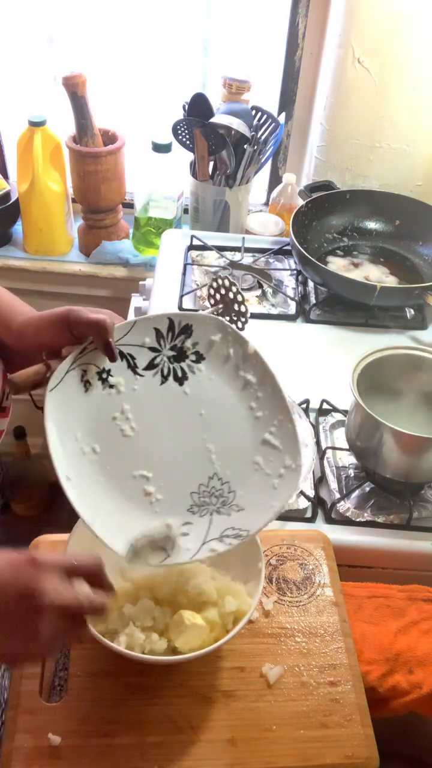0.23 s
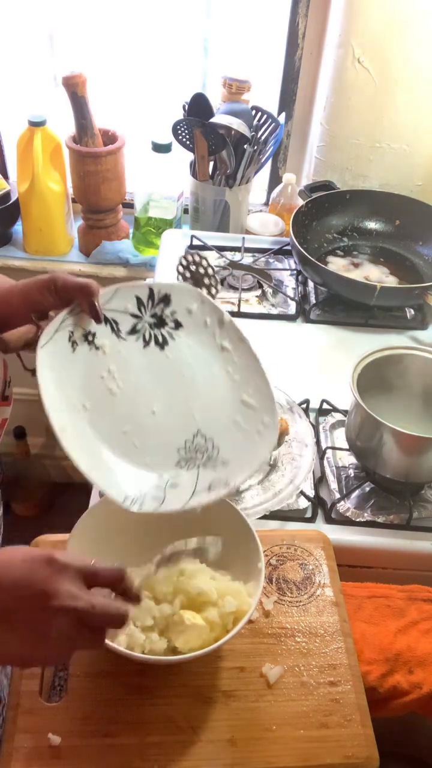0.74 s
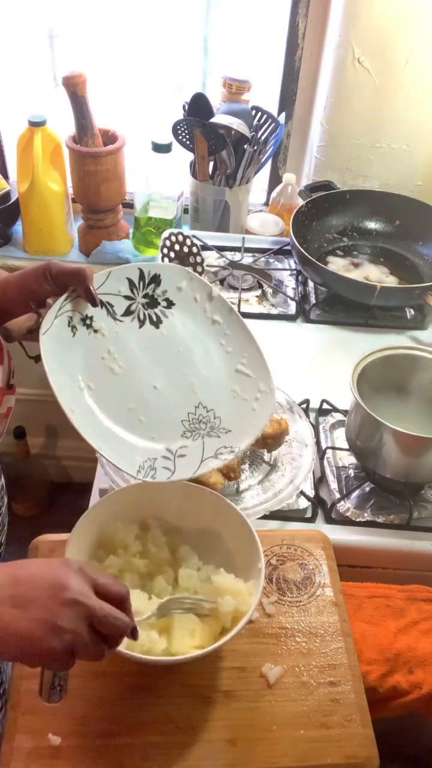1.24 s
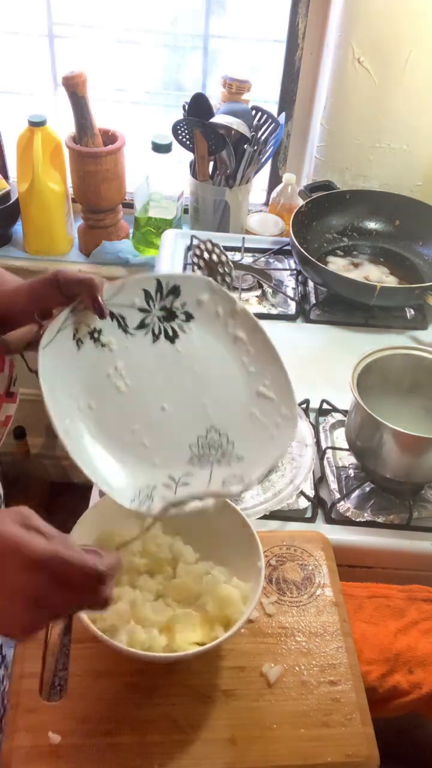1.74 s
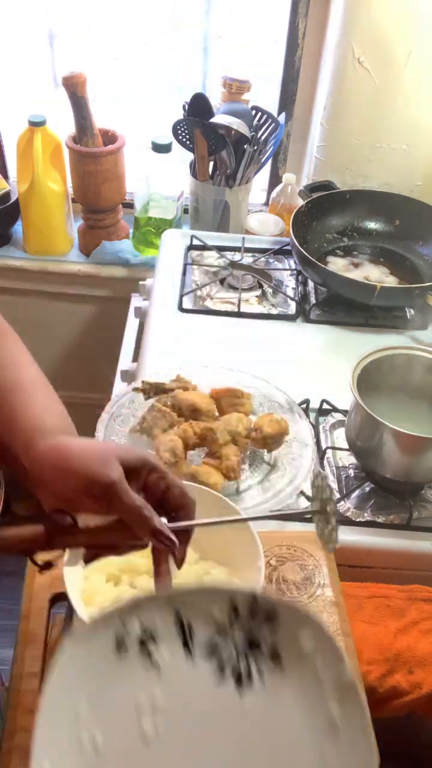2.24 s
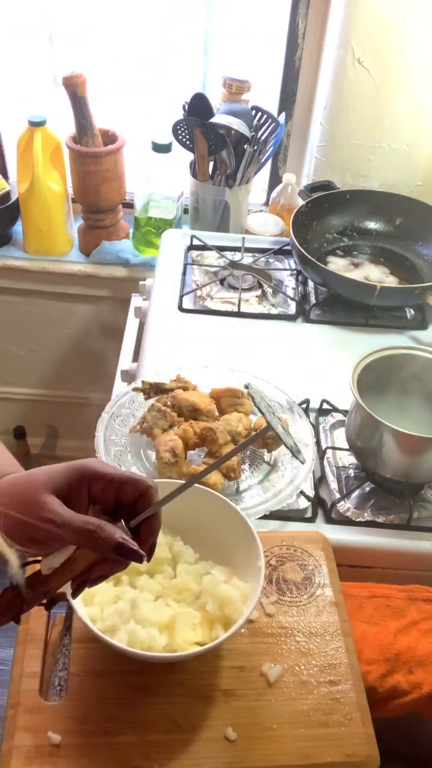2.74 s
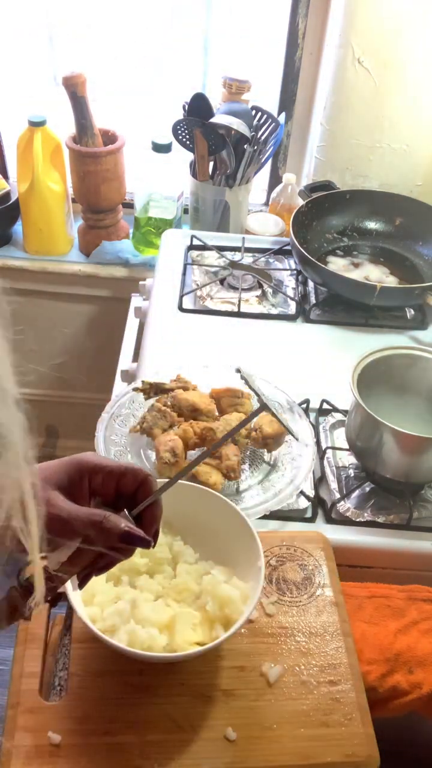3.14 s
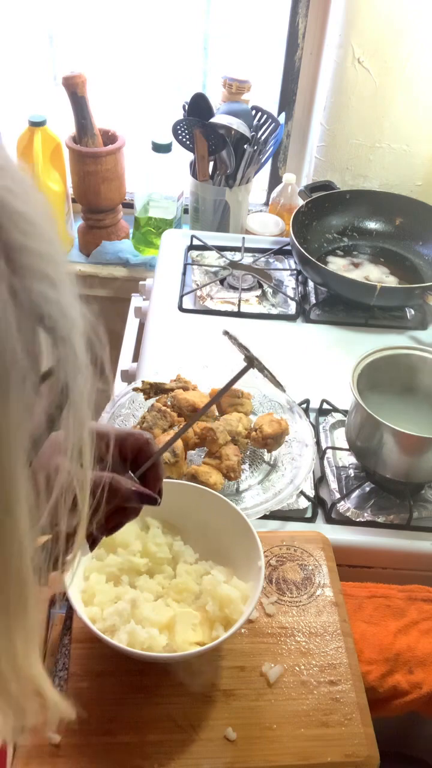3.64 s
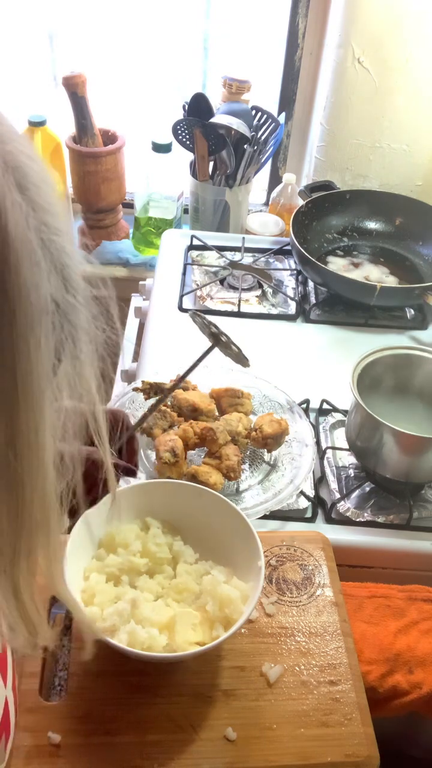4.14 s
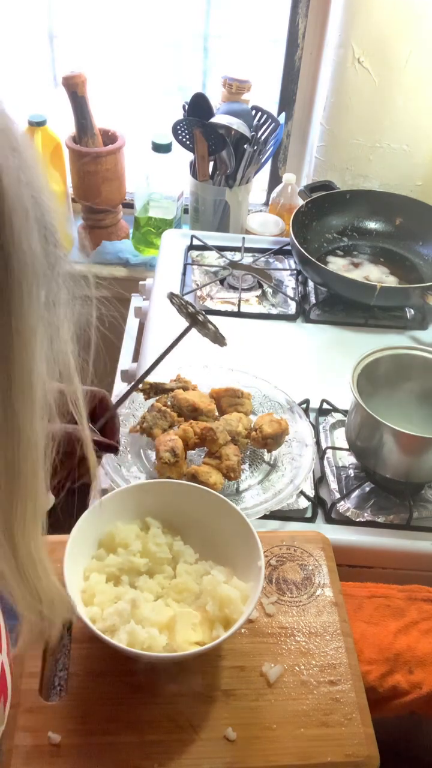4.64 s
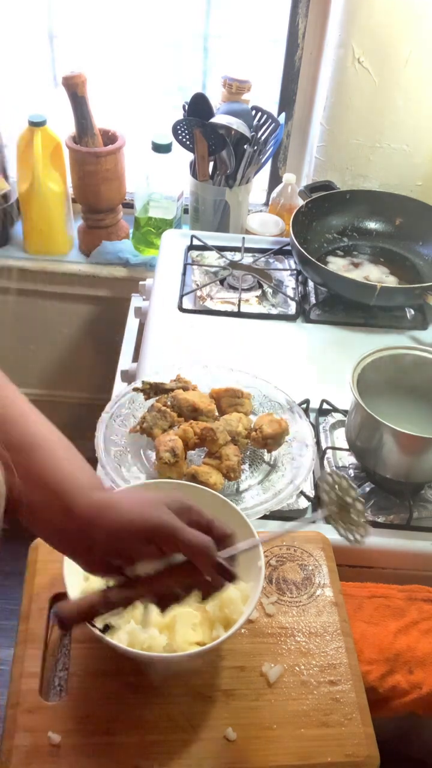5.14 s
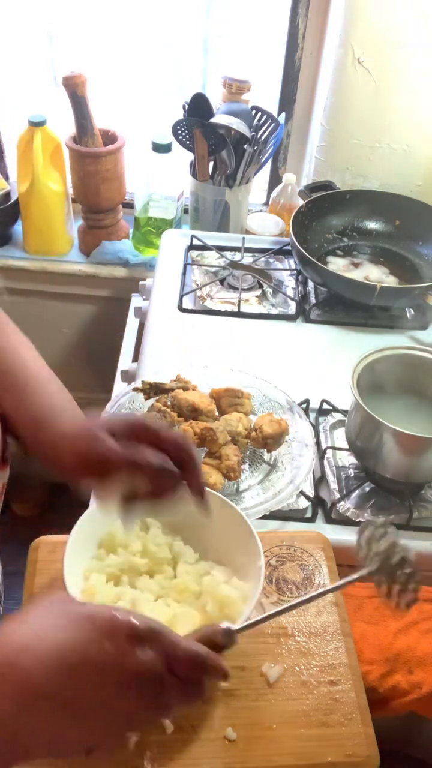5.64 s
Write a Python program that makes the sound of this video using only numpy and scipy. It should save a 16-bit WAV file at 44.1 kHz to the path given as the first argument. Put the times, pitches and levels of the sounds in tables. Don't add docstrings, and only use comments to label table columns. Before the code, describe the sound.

Light utensil taps and one hard plate knock, a quiet gap, then a burst of crashing dishes in a booming sink and running water.

```python
import sys
import numpy as np
from scipy import signal
from scipy.fft import rfft, irfft, next_fast_len
from scipy.io import wavfile
from scipy.ndimage import uniform_filter1d

SR = 44100
rng = np.random.default_rng(int(sys.argv[2]) if len(sys.argv) > 2 else 0)


def volts_from_decibels(level):
    exponent = np.asarray(level, float) / 20
    return 10 ** exponent


def store_pcm(level_fs):
    pcm = np.round(np.clip(level_fs, -1, 1) * 32767).astype(np.int16)
    wavfile.write(sys.argv[1], SR, np.atleast_2d(pcm).T)


N = 259743
FFT_SIZE = next_fast_len(N)
SPLIT_HZ = 4700

# f/Hz, level/dB, t60/s
PLATE = [(330, -10, .06), (581, -15, .08), (781, -5, .07), (1690, -12, .12), (2760, -2, .03),
         (2880, 0, .045), (2980, -3, .07), (3591, -13, .05), (3941, -12, .07), (4350, -8, .1)]
PLATE_RIM = [(5730, 1.5, 0.059), (5780, -10, 0.13), (7100, -0.5, 0.021), (9630, 1.5, 0.032),
             (9700, -21.5, 0.056), (10760, -24.5, 0.17)]
# f/Hz, density/dB per Hz
CRACK_BODY = [(210, -54), (400, -13), (746, 0), (824, -3), (1470, -7), (1660, -9), (4000, -7.5),
              (5000, -27), (6500, -61.5), (11000, -120)]
CRACK_BRIGHT = [(2880, -23.5), (4900, -0.5), (5330, -6), (6210, 3), (6760, -8), (8000, 0), (8620, -4),
                (9800, -7), (11500, -15.5), (12300, -36), (14600, -24), (16000, -42.5)]


def rms_one(x):
    return x / np.sqrt(np.mean(x ** 2) + 1e-20)


def on_grid(points, column=1):
    hz = np.maximum(np.fft.rfftfreq(FFT_SIZE, 1 / SR), 1)
    points = np.array(points)
    return np.interp(np.log(hz), np.log(points[:, 0]), points[:, column])


def shaped(x, response):
    return irfft(rfft(x, FFT_SIZE) * response, FFT_SIZE)[:N]


def coloured(x, colour):
    return shaped(x, rms_one(volts_from_decibels(on_grid(colour))))


def step(at_s, rise_s):
    return np.clip((np.arange(N) / SR - at_s) / rise_s, 0, 1)


def drift(rate, size=N):
    r = np.exp(-80 * np.pi * rate / SR)
    white = rng.standard_normal(size // 40 + 2002)
    slow = signal.lfilter([1], [1, -2 * r, r * r], white)[2000:]
    return np.interp(np.arange(size) / 40, np.arange(len(slow)), rms_one(slow))


def grains(colour, per_s, spread_db, flicker_db):
    sizes = volts_from_decibels(spread_db * np.minimum(rng.exponential(1, N), 4)) * rng.choice([-1, 1], N)
    happens = rng.random(N) < per_s / SR
    return rms_one(coloured(sizes * happens * volts_from_decibels(flicker_db * drift(15)), colour))


def strokes(rows, attack_s, column=3):
    t = np.arange(0, N + 32, 32)[:, None] / SR
    rows = np.array(rows)
    start, length, fade = rows[:, 0], rows[:, 1], np.maximum(rows[:, 2], .005)
    swell = np.clip((t - start) / attack_s, 0, 1) ** 2
    shape = swell * volts_from_decibels(-20 * np.maximum(t - start - length, 0) / fade)
    power = np.sum((shape * volts_from_decibels(rows[:, column])) ** 2, axis=1)
    return np.interp(np.arange(N) / SR, t[:, 0], np.sqrt(power))


def ring(push, hz, t60):
    r, w = volts_from_decibels(-60 / (t60 * SR)), 2 * np.pi * hz / SR
    return signal.lfilter([.5, 0, -.5], [1, -2 * r * np.cos(w), r * r], push + 1e-18)


def ring_cluster(push, hz, t60):
    spread = .008 * (1 + hz / SPLIT_HZ) * (np.linspace(-1, 1, 4) + rng.normal(0, .3, 4))
    cluster = sum((-.85) ** k * ring(push, hz * (1 + d), t60) for k, d in enumerate(spread))
    return cluster * volts_from_decibels(4 * drift(70, size=len(push)) - 2)


def struck(contacts, modes, longest_s, ring_db, crack_db, rise_s):
    chatter, push = np.zeros((2, N)), np.zeros((2, N))
    white = rng.standard_normal(N)
    t = np.arange(SR // 5) / SR
    swell = 1 - np.exp(-t / np.array([[max(rise_s, 1e-4)], [2e-4]]))
    for s, body_db, bright_db, touch_s in contacts:
        i, touch_s = round(s * SR), np.clip(touch_s, .001, .04)
        levels = volts_from_decibels([[body_db], [bright_db]])
        burst = swell * np.exp(-t / touch_s) * white[i:i + len(t)] * levels
        chatter[:, i:i + len(t)] += burst
        push[:, i:i + len(t)] += burst / np.sqrt(touch_s * SR / 2)
    out = np.zeros(N)
    first, last = min(contacts)[0], max(contacts)[0]
    span = slice(round(first * SR), round(last * SR) + SR // 2)
    for bright in (0, 1):
        group = [m for m in modes if (m[0] > SPLIT_HZ) == bright]
        total = np.sqrt(sum(volts_from_decibels(m[1]) ** 2 for m in group))
        for hz, db, t60 in group:
            rung = ring_cluster(push[bright, span], hz, min(t60, longest_s))
            out[span] += volts_from_decibels(db + ring_db) / total * rung
    crack = coloured(chatter[0], CRACK_BODY) + coloured(chatter[1], CRACK_BRIGHT)
    return out + volts_from_decibels(crack_db) * crack


def rings(rows):
    rough = .7
    out, t = np.zeros(N), np.arange(SR // 5) / SR
    waver = volts_from_decibels(2.5 * drift(73))
    shake = drift(80, size=len(t) * len(rows)).reshape(len(rows), -1)
    for (s, hz, db, t60), shaken in zip(rows, shake):
        i = round(s * SR)
        wander = rough * np.clip(hz / 2500, .6, 2.5) * shaken
        swing = np.sin(2 * np.pi * hz * t + wander) * volts_from_decibels(2.5 * rough * shaken[::-1])
        decay = volts_from_decibels(db - 60 * t / max(t60, .01)) * (1 - t / t[-1])
        out[i:i + len(t)] += decay * (1 - np.exp(-t / .002)) * swing
    return out * waver


def plate_knock():
    # t/s, body/dB, brightness/dB, contact time/s
    bounces = [
        (.484, -35.5, -65, 0.0022),
        (.4915, -12.5, -36.5, 0.0021),
        (.506, -36, -54, 0.0019),
        (.518, -40.5, -54, 0.011),
    ]
    # t/s, f/Hz, peak/dB, t60/s
    rung = [(.484, 2855, -27.5, 0.063), (.4935, 2906, -6, 0.022), (.493, 4270, -27, 0.033),
            (.493, 786, -22.5, 0.036), (.494, 3890, -26, 0.061), (.494, 3480, -31, 0.071),
            (.5, 1707, -32, 0.081), (.508, 3010, -24.5, 0.051), (.508, 4280, -28.5, 0.074),
            (.519, 243, -34, 0.09), (.519, 2900, -39.5, 0.04), (.499, 2650, -23, .03)]
    blow = struck(bounces, PLATE + PLATE_RIM, longest_s=.053, ring_db=6, crack_db=-13.5, rise_s=.003)
    return blow + rings(rung)


def knock_gain():
    at_s, damp_db = .538, -17
    return volts_from_decibels(damp_db * (step(at_s, .006) + step(at_s, .15)))


def spoon_taps():
    # t/s, body/dB, brightness/dB, contact time/s
    taps = [
        (0.0004, -39.5, -42, 0.011),
        (0.258, -52, -43, 0.022),
        (0.2683, -41, -54, 0.0071),
        (0.391, -66.5, -68, 0.003),
        (0.5878, -46, -38, 0.013),
        (0.6201, -38, -35.5, 0.011),
    ]
    # t/s, f/Hz, peak/dB, t60/s
    sung = [(.0005, 110, -32.5, .04), (.0002, 620, -32.5, 0.021), (0.49, 5780, -35, 0.11),
            (.491, 9560, -42, 0.12), (0.89, 2900, -57.5, 0.069), (.585, 2950, -47, 0.097),
            (.62, 2900, -44, 0.067), (.622, 4100, -46, 0.089), (.07, 2050, -62, .15), (0.09, 6600, -59, .2),
            (0.11, 2000, -53, .2), (0.24, 5600, -52, .1), (.15, 8200, -62, .15)]
    modes = PLATE[3:] + PLATE_RIM
    blow = struck(taps, modes, longest_s=.053, ring_db=-1.5, crack_db=-7, rise_s=.0038)
    return blow + rings(sung)


def scrape():
    # t/s, length/s, time to fade 20 dB/s, level/dB
    edge_strokes = [
        (-.01, 0.016, -2, -47),
        (.03, 0.25, 0.11, -58),
        (.254, 0.03, -0.08, -45.5),
        (.54, 0.07, 0.17, -56),
        (.612, 0.032, 0, -51),
    ]
    # f/Hz, density/dB per Hz
    colour = [(880, -49), (1500, -7.5), (2030, -14), (2350, -23.5), (2750, 1), (3150, -6.5), (4180, -2.5),
              (5400, -13), (6050, 1), (6620, -25.5), (7100, -11.5), (9700, -13), (15500, -44.5)]
    slips = grains(colour, per_s=1500, spread_db=2, flicker_db=-3)[:SR]
    spots_hz = np.geomspace(2000, 11000, 26) * volts_from_decibels(rng.normal(0, .2, 26))
    rung = sum(volts_from_decibels(4 * drift(12, size=SR)) * ring(slips, hz, .022) for hz in spots_hz)
    sound = rms_one(slips + volts_from_decibels(.5) * rms_one(rung))
    return strokes(edge_strokes, attack_s=.012) * np.pad(sound, (0, N - SR))


def bowl_taps():
    # t/s, body/dB, brightness/dB, contact time/s
    taps = [
        (1.9058, -62, -54.5, 0.00348),
        (1.969, -45, -67, 0.0025),
        (1.9755, -27.5, -26.5, 0.0021),
        (1.983, -32.5, -33.5, 0.0031),
    ]
    # f/Hz, level/dB, t60/s
    modes = [(3160, -7.5, 0.04), (2930, -12, 0.022), (3975, -15.5, 0.072), (4330, -9, .09),
             (4990, -14, 0.056), (5680, -4, 0.037), (6040, -5, .08), (7240, -6.5, 0.071),
             (8150, -9.5, 0.05), (9465, 2, 0.04), (9580, -4, 0.017), (9900, -28, 0.048),
             (10900, -13, 0.044), (11700, -11.5, .05)]
    return struck(taps, modes, longest_s=.032, ring_db=8, crack_db=-5, rise_s=.0021)


def pan_knocks():
    # t/s, body/dB, brightness/dB, contact time/s
    knocks = [(2.798, -35, -55.5, 0.015), (2.8257, -33, -54, 0.023), (2.9592, -26.5, -53.5, 0.0096),
              (2.98, -36, -53, 0.0096), (3.119, -36.5, -49.5, 0.023), (3.1544, -51, -57, 0.022),
              (3.2054, -35.5, -79, 0.0046), (3.256, -21, -57, 0.0025), (3.2873, -27, -54, 0.02),
              (3.3256, -23, -59, 0.013), (3.4155, -11.5, -37.5, 0.019), (3.4276, -18, -35, 0.014),
              (3.454, -20, -37.5, 0.045), (3.4828, -30, -44.5, 0.028), (3.549, -22, -41, 0.0098),
              (3.561, -18, -36, 0.0093), (3.5886, -25, -40, 0.011), (3.746, -36, -43.5, 0.042),
              (3.8564, -37, -45, 0.047), (4.3234, -27, -41, 0.021), (4.4348, -35.5, -45, 0.036)]
    # f/Hz, level/dB, t60/s
    modes = [(870, 11, 0.14), (1314, -18, 5.0), (1800, 1, 0.54), (2176, 27.5, 5.0), (2590, 12, 0.16),
             (3042, -6, 5.0), (3941, -19, 0.66), (7000, -31, 0.23)]
    return struck(knocks, modes, longest_s=.054, ring_db=-17.5, crack_db=-3, rise_s=.0028)


def dish_clacks():
    # t/s, body/dB, brightness/dB, contact time/s
    clacks = [
        (3.9546, -6, -39, 0.0091),
        (3.9694, -9.5, -21.5, 0.013),
        (4.0014, -14, -47, 0.02),
        (4.0298, -10, -14.5, 0.0063),
        (4.0444, -14, -34, 0.0082),
        (4.0874, -19, -37, 0.031),
        (4.1102, -37, -50, 0.0046),
        (4.1503, -34.5, -45, 0.041),
    ]
    # f/Hz, level/dB, t60/s
    modes = [(870, -6, 1.0), (1497, -2, 0.19), (2240, -12.5, 0.25), (2170, -6, 0.11), (2410, -8, 0.17),
             (3060, 7, 0.12), (3110, -15, 0.17), (3920, -12, 0.17), (4200, 7, 0.18), (6060, -9, 0.35),
             (7200, -20, 0.18), (7340, -14, 0.052), (9070, -32, 0.084)]
    # t/s, f/Hz, peak/dB, t60/s
    vessels = [(3.257, 489, -22, 0.057), (3.33, 921, -30.5, 0.11), (3.33, 580, -30.5, 0.065),
               (3.416, 3158, -17.5, 0.06), (3.42, 4345, -26, 0.1), (3.424, 815, -6.5, 0.045),
               (3.425, 1360, -19.5, 0.13), (3.428, 570, -14, 0.07), (3.432, 2362, -17.5, 0.11),
               (3.455, 970, -19, 0.075), (3.456, 1323, -21.5, 0.058), (3.462, 3060, -20.5, 0.084),
               (3.485, 814, -21.5, 0.12), (3.485, 558, -24, 0.099), (3.51, 1690, -37, 0.13),
               (3.551, 1350, -26.5, 0.11), (3.56, 2108, -23, 0.067), (3.56, 2777, -25, 0.082),
               (3.562, 3430, -25, 0.093), (3.57, 546, -28.5, 0.088), (3.585, 672, -32, 0.17),
               (3.59, 1340, -35.5, 0.037), (3.61, 504, -31.5, 0.18), (3.627, 4010, -26, 0.054),
               (3.63, 2410, -39, 0.13), (3.66, 3988, -30, 0.13), (3.748, 672, -36.5, 0.089),
               (3.77, 900, -34, 0.062), (3.858, 560, -30.5, 0.096), (3.897, 920, -26, 0.069),
               (3.916, 824, -16.5, 0.099), (3.922, 2840, -14, 0.065), (3.945, 1729, -17.5, 0.15),
               (3.95, 4270, -22, 0.19), (3.953, 828, -17, 0.16), (3.953, 2417, -17, 0.077),
               (3.97, 826, -15.5, 0.16), (3.975, 2207, -21.5, 0.15), (3.98, 2834, -22, 0.13),
               (3.995, 795, -34, 0.076), (4.027, 3160, -11, 0.046), (4.028, 3966, -18, 0.12),
               (4.031, 1571, -18, 0.29), (4.032, 829, -17, 0.13), (4.04, 2377, -17, 0.1),
               (4.047, 3150, -24, 0.12), (4.09, 823, -19, 0.072), (4.088, 2767, -21.5, 0.056)]
    blows = struck(clacks, modes, longest_s=.038, ring_db=-10.5, crack_db=-4, rise_s=.005)
    return blows + rings(vessels)


def cutlery_clinks():
    # t/s, body/dB, brightness/dB, contact time/s
    clinks = [
        (3.6044, -50, -38, 0.0025),
        (3.6258, -37.5, -36.5, 0.017),
        (3.659, -32.5, -36, 0.023),
        (3.7777, -35.5, -37.5, 0.021),
        (3.911, -21.5, -15, 0.0095),
        (3.9264, -15.5, -27.5, 0.018),
              (3.885, -26, -42, 0.021),
        (3.9, -20.5, -33, 0.0074),
    ]
    # f/Hz, level/dB, t60/s
    modes = [(785, -10, 0.06), (2810, -9.5, 0.47), (2970, -4, 0.25), (3500, -14.5, 5.0), (4220, -5.5, 0.13),
             (4520, 12.5, 0.44), (6600, -6, 0.044), (7400, -9, 0.12), (7350, -5.5, 0.14), (8230, -1, 0.052),
             (8460, -10.5, 0.49), (8100, -6, 0.04), (8400, -3.5, 0.13), (10500, -26, 0.18)]
    # t/s, f/Hz, peak/dB, t60/s
    singles = [(2.829, 2350, -39.5, 0.099), (2.96, 3810, -41, .04), (2.979, 3840, -38, .04),
               (3.12, 3500, -33, 0.031), (3.285, 2314, -24, 0.037), (3.607, 8260, -36, .07),
               (3.607, 9900, -39, .04), (3.627, 7000, -32, 0.064), (3.627, 9300, -37, .07),
               (3.659, 8230, -35.5, .12), (3.66, 9300, -42, .12), (3.662, 7000, -34, .06),
               (3.781, 4840, -39.5, 0.052), (3.795, 4310, -34.5, .07), (3.911, 7700, -14, .09),
               (3.911, 9470, -18.5, 0.075), (3.909, 6200, -17.5, .05), (3.913, 8150, -26, .07),
               (3.925, 5730, -24, 0.13), (4.326, 3195, -36, 0.14), (4.33, 1040, -31, 0.18)]
    blows = struck(clinks, modes, longest_s=.045, ring_db=-6, crack_db=1, rise_s=.0133)
    return blows + rings(singles)


def ticks():
    # t/s, peak/dB
    rim_knocks = [(2.962, -31.5), (3.1192, -28), (3.2544, -34), (3.287, -29.5), (3.3264, -28.5),
                  (3.4163, -11), (3.4566, -9), (3.5618, -16), (3.6259, -25.5), (3.6602, -21), (3.7452, -33),
                  (3.7778, -27.5), (3.8562, -26), (3.8704, -30), (3.8846, -16), (3.9099, -10), (3.9527, -8),
                  (4.0282, -6)]
    out, t = np.zeros(N), np.arange(SR // 20) / SR
    for s, db in rim_knocks:
        i = round(s * SR)
        out[i:i + len(t)] += volts_from_decibels(db - 10.5) * np.exp(-t / .0013)
    out = out * rng.standard_normal(N)
    return coloured(out, CRACK_BODY) + volts_from_decibels(-12.5) * coloured(out, CRACK_BRIGHT)


def snaps():
    # t/s, level/dB
    puffs = [(.001, -62), (.267, -69), (0.4922, -45), (1.9755, -61.5), (3.418, -57), (3.495, -59),
             (3.565, -57), (3.63, -60), (3.665, -60), (3.79, -56), (3.913, -46), (4.03, -51), (4.051, -60)]
    # f/Hz, density/dB per Hz
    colour = [(6000, -22), (11000, -7), (13000, -9), (14500, 1), (15600, 0), (16400, -40)]
    out, t = np.zeros(N), np.arange(SR // 10) / SR
    for s, db in puffs:
        i = round(s * SR)
        out[i:i + len(t)] += volts_from_decibels(db) * np.exp(-t / .006)
    return coloured(out * rng.standard_normal(N), colour)


def sink():
    # t/s, peak/dB, pitch favoured by the spot f/Hz
    thuds = np.array([(0.544, -36, 56), (1.398, -36, 56), (2.818, -18, 89), (3.166, -26.5, 116),
                      (3.253, -25.5, 104), (3.436, -19, 120), (3.501, -20.5, 110), (3.967, -11, 85),
                      (4.232, -22, 180), (4.349, -9, 165), (4.391, -14.5, 164)])
    # f/Hz, level/dB, t60/s
    modes = [(56, 4, 0.22), (107.2, 1, 0.29), (147.6, -1, 0.13), (183.3, -1.5, 0.31), (273.1, -2, 0.19)]
    at = [round(s * SR) for s in thuds[:, 0]]
    out = np.zeros(N)
    spread_db = rng.normal(0, 3.1, (len(at), len(modes)))
    for k, (hz, level_db, t60) in enumerate(modes):
        octaves_off = np.abs(np.log2(thuds[:, 2] / hz))
        push = np.zeros(N)
        push[at] = volts_from_decibels(thuds[:, 1] + level_db - 14 + spread_db[:, k] - 15.5 * octaves_off)
        out += ring(push, hz, t60)
    soft = signal.butter(2, 320, fs=SR, output="sos")
    return signal.sosfilt(soft, out * volts_from_decibels(1.5 * drift(25)))


def rumble_and_rub():
    # t/s, length/s, time to fade 20 dB/s, rumble/dB, rub/dB
    stretches = [(-.03, 0.0063, 0.37, -50.5, -113), (.486, 0.039, 0.0625, -44.5, -40),
                 (.808, 0.13, -0.31, -90, -68), (1.15, 0.073, 0.6, -83, -67), (1.338, 0.057, -0.88, -42, -47),
                 (1.786, 0.072, 0.23, -57, -62), (2.378, 0.44, -1.5, -42, -47),
                 (2.79, 0.13, 0.28, -37.5, -45.5), (3.2, 0.19, 0.52, -38, -40), (3.41, 0.15, -0.03, -35, -41),
                 (3.6, 0.37, -4.5, -74, -51), (3.85, 0.16, -2.2, -46.5, -41), (3.94, 0.21, -0.1, -39, -64),
                 (4.21, 0.15, 0, -51, -46), (4.32, 0.14, -0.5, -37.5, -45), (4.46, 0.24, 0.52, -46, -47.5),
                 (4.76, 0.25, 1.2, -55.5, -55.5), (5.09, 0.206, -0.1, -53, -54),
                 (5.54, 0.2, 0.08, -40.5, -44.5), (5.76, 0.12, 18, -58.5, -59)]
    # f/Hz, density/dB per Hz
    rumble_colour = [(12, -51), (20, -25), (43, 0.5), (109, -1), (182, -8), (209, -1), (381, -6.5),
                     (600, -12), (780, -13), (1320, -120)]
    rub_colour = [(180, -16), (300, -7), (508, -6.5), (603, -6.5), (828, -11), (969, -5.5), (1480, -14.5),
                  (2890, -18.5), (4080, -23.5), (7000, -60), (15400, -120)]
    lumps = grains(rumble_colour, per_s=2000, spread_db=2, flicker_db=1.5)
    rub = grains(rub_colour, per_s=9800, spread_db=1, flicker_db=.16)
    return strokes(stretches, attack_s=.02) * lumps + strokes(stretches, attack_s=.017, column=4) * rub


def tap():
    # f/Hz, density/dB per Hz
    jet_colour = [(2530, -27), (4300, -7.5), (5100, -9), (5890, 3.5), (7780, -9), (8060, 7), (8460, 5),
                  (9470, -2.5), (10300, -3), (11300, -2), (12200, -25), (15900, -30), (22000, -120)]
    spray_colour = [(1200, -52), (2300, -62), (4000, -31), (11500, -21.5), (12500, -29.5), (15500, -24.5),
                    (16500, -75)]
    # f/Hz, width/Hz, level/dB
    cavities = [(5760, 300, -11), (6680, 240, -3.5), (7360, 130, -4), (8280, 37, 7.5), (9560, 55, -22),
                (10070, 190, 0), (10860, 220, -7), (11700, 54, -17)]
    open_s, more_s, rise_s = 4.308, 4.54, .022
    level_db, more_db = -45, 2.5
    jet = grains(jet_colour, per_s=23000, spread_db=3, flicker_db=1.56)
    spray = volts_from_decibels(-10.5) * grains(spray_colour, per_s=13000, spread_db=6.5, flicker_db=1.5)
    white, whistles = rng.standard_normal(2 * SR), 0
    for hz, width, db in cavities:
        t60 = np.log(1000) / np.pi / width
        tone = rms_one(ring(ring(white, hz, t60 / 2), hz, t60))
        whistles = whistles + volts_from_decibels(db + 2 * drift(7.6, size=2 * SR)) * np.sqrt(width) * tone
    whistles = np.pad(rms_one(whistles), (N - 2 * SR, 0))
    flow = step(open_s, rise_s) ** 2 * volts_from_decibels(level_db + more_db * step(more_s, rise_s))
    return flow * (jet + volts_from_decibels(.5) * whistles + spray) * volts_from_decibels(-3.5)


def splash():
    # t/s, length/s, time to fade 20 dB/s, level/dB
    gushes = [
        (4.45, 0.54, -0.8, -53.5),
        (5.06, 0.22, 0, -56.5),
        (5.535, 0.222, 0.06, -52),
    ]
    # f/Hz, density/dB per Hz
    colour = [(1200, -27), (2200, -11), (2900, -3.5), (4000, 1), (4600, -4), (5200, -14), (7000, -49.5)]
    return strokes(gushes, attack_s=.018) * grains(colour, per_s=5800, spread_db=3, flicker_db=0)


def kitchen(x):
    t60_s, level_db = .36, -12
    t = np.arange(SR // 2) / SR
    tail = rng.standard_normal(len(t)) * volts_from_decibels(-60 * t / t60_s) * (t > .004)
    dull = signal.sosfilt(signal.butter(2, 6000, fs=SR, output="sos"), tail)
    treble = (tail - dull) * volts_from_decibels(-60 * t / 1.2)
    tail = signal.lfilter([1], [1, -.25], dull + treble)
    tail = tail / np.sqrt(np.sum(tail ** 2))
    return volts_from_decibels(level_db) * signal.fftconvolve(x, [tail], axes=1)[:, :N]


def kitchen_hum():
    # f/Hz, density/dB per Hz
    colour = [(12, -51), (20, -13.5), (58, -6), (122, -14.5), (263, -11), (356, -17), (408, -10.5),
              (551, -11.5), (599, -2.5), (650, -11.5), (706, -6), (1250, -24), (4190, -45), (5790, -32.5),
              (6700, -45.5), (8900, -39), (14000, -65)]
    return volts_from_decibels(-57.5) * grains(colour, per_s=66000, spread_db=3.5, flicker_db=2)


def ports(mid):
    # f/Hz, side over mid/dB, share that is a pure lag (signed, -1 to 1)
    port_table = [(295, -60, 0.17), (602, -48.5, -0.26), (993, -12, 0.78), (1539, 1, -0.41),
                  (2610, 1, 0.69), (3944, -2.5, 0.94), (4940, 4, 0.095), (5600, 1, 0.36),
                  (7070, -5.5, 0.028), (7700, -21.5, -.9), (9490, -24, 0.77), (9900, -6, -0.38),
                  (11600, 7, 1), (12900, 3.5, .9), (15000, 4, -.9), (16100, -29, 0)]
    share = np.clip(on_grid(port_table, column=2), -1, 1)
    t = np.arange(SR // 10) / SR
    scatter = rfft(rng.standard_normal(len(t)) * np.exp(-t / .04), FFT_SIZE)
    scatter = scatter / np.sqrt(np.mean(np.abs(scatter) ** 2))
    mixture = -1j * share + np.sqrt(1 - share ** 2) * scatter
    side = shaped(mid, volts_from_decibels(on_grid(port_table)) * mixture)
    dip_hz, dip_width_hz, dip_db = 6600, 120, -9.5
    hz = np.fft.rfftfreq(FFT_SIZE, 1 / SR)
    mid = shaped(mid, volts_from_decibels(dip_db * np.exp(-((hz - dip_hz) / dip_width_hz) ** 2)))
    return np.array([mid + side, mid - side])


def denoise(x, depth):
    top_hz, gate_db = 11700, -82
    hz, _, (mid, side) = signal.stft([x[0] + x[1], x[0] - x[1]], SR, nperseg=1024, noverlap=512)
    power = (np.abs(mid) ** 2 + np.abs(side) ** 2) / 4 + 1e-18
    around = uniform_filter1d(power, size=13, axis=0)
    gain = (power / around) ** (np.clip(depth, 0, 1) / 2)
    gain *= np.sqrt(around / uniform_filter1d(power * gain ** 2, size=13, axis=0))
    loud = uniform_filter1d(np.abs(mid / 2) ** 2, size=21, axis=0) > volts_from_decibels(gate_db) ** 2
    mid = mid * (loud | (hz[:, None] < top_hz))
    cleaned = np.array([mid, side]) * gain / 2
    mid, side = signal.istft(cleaned, SR, nperseg=1024, noverlap=512)[1][:, :N]
    return np.array([mid + side, mid - side])


def scene():
    clatter = ticks() + spoon_taps() + bowl_taps() + pan_knocks() + cutlery_clinks() + dish_clacks()
    blows = np.array([plate_knock(), clatter])
    knock, clatter = blows + kitchen(blows)
    blows = knock * knock_gain() + clatter
    scrape_and_rumble = scrape() + rumble_and_rub()
    water = tap() + splash()
    return ports(blows + snaps() + sink() + scrape_and_rumble + water + kitchen_hum())


def band_limit(x):
    return signal.sosfilt(signal.butter(12, 16450, fs=SR, output="sos"), x)


def record(dry):
    cleaned = denoise(dry, depth=0.35)
    finished = 2 * np.tanh(cleaned / 2)
    return band_limit(finished)


dry = scene()
out = record(dry)
store_pcm(out)
```